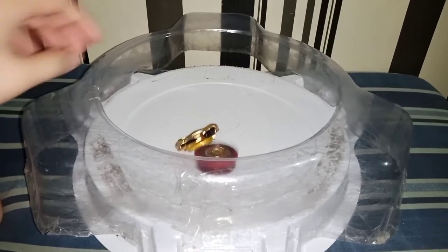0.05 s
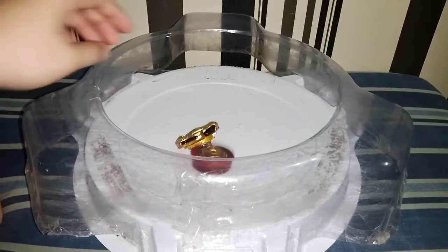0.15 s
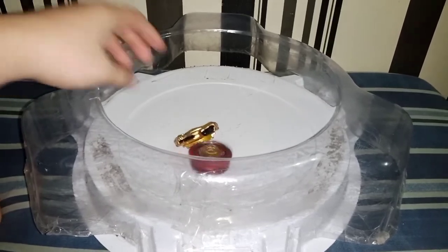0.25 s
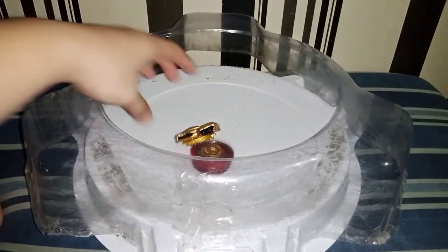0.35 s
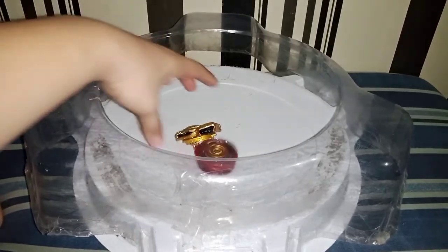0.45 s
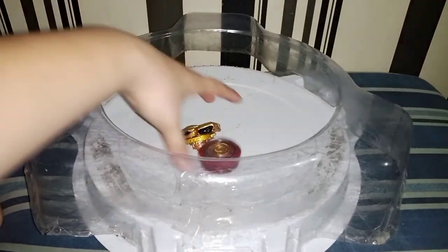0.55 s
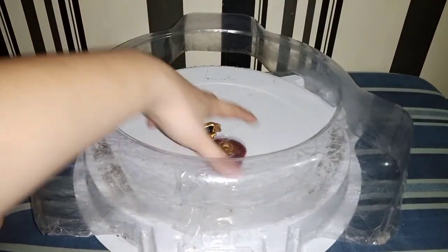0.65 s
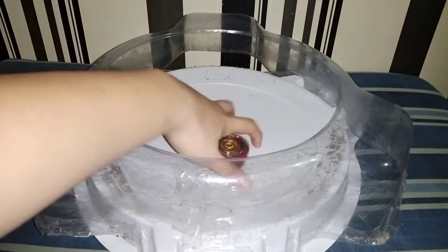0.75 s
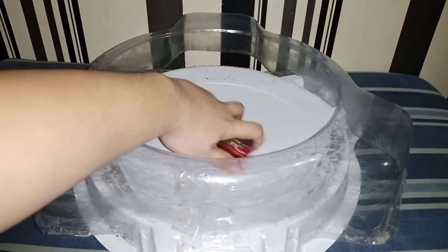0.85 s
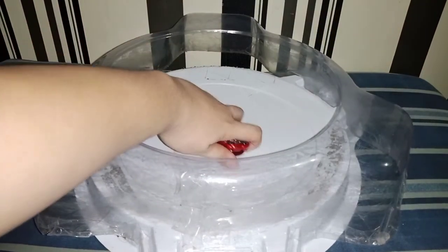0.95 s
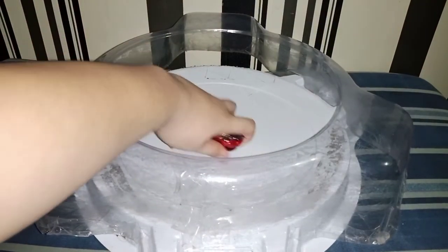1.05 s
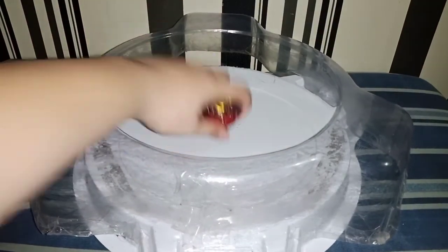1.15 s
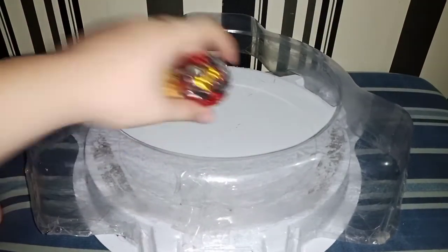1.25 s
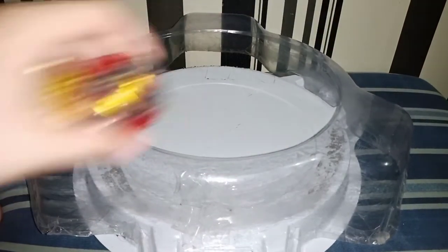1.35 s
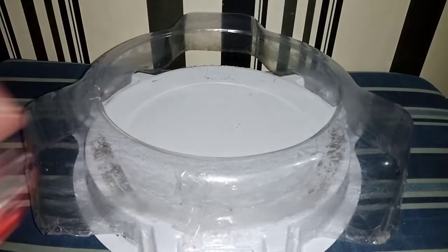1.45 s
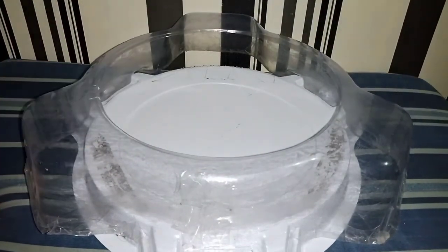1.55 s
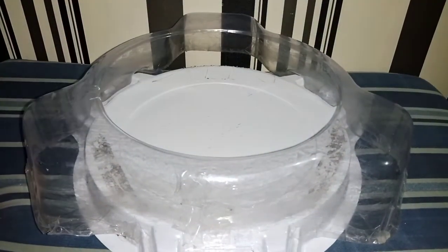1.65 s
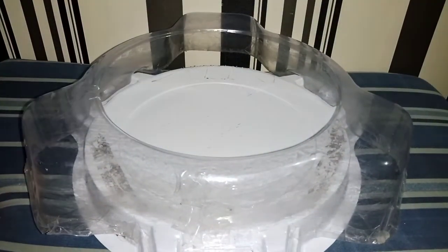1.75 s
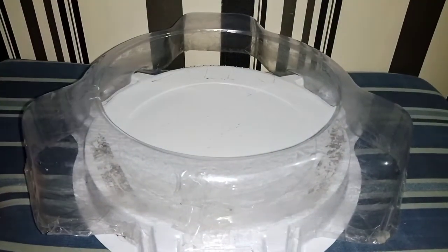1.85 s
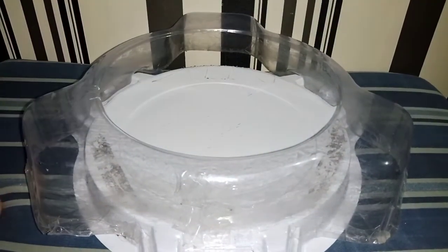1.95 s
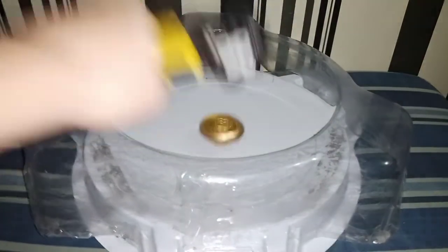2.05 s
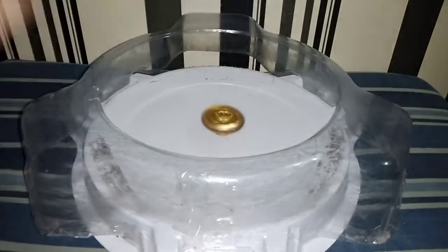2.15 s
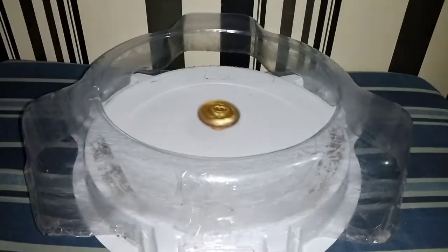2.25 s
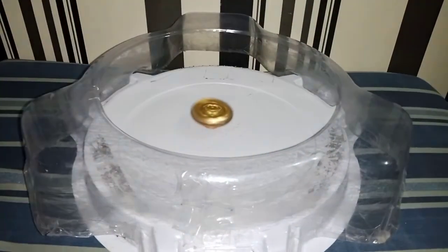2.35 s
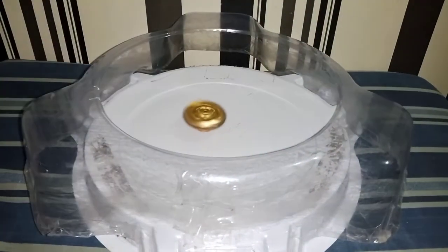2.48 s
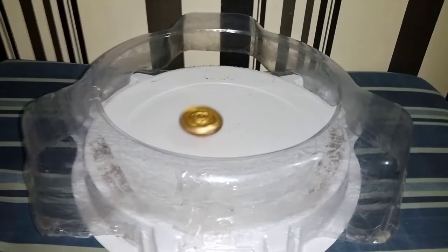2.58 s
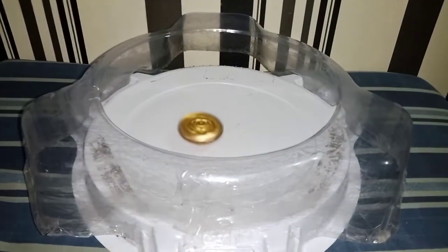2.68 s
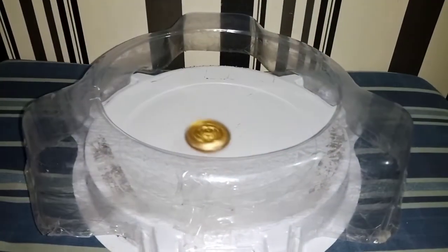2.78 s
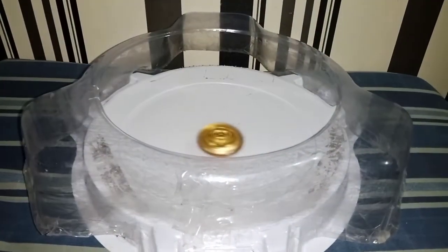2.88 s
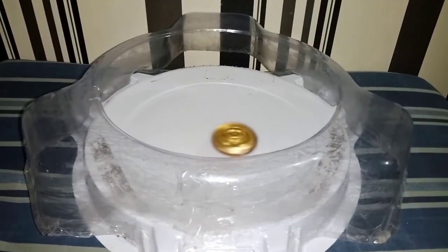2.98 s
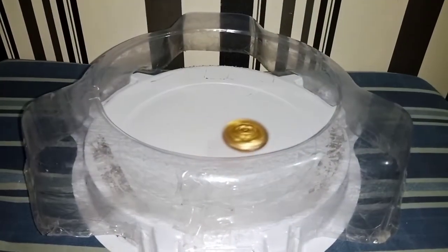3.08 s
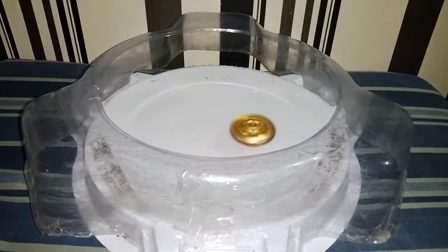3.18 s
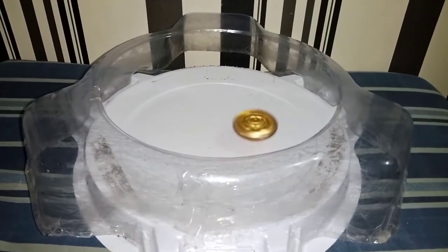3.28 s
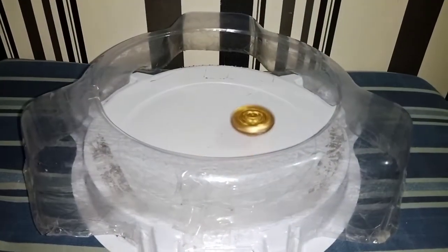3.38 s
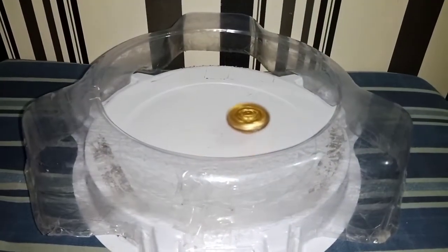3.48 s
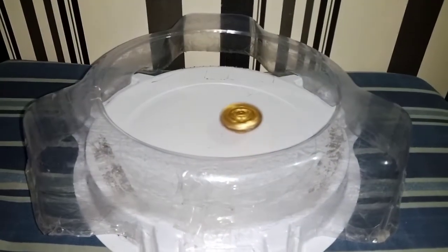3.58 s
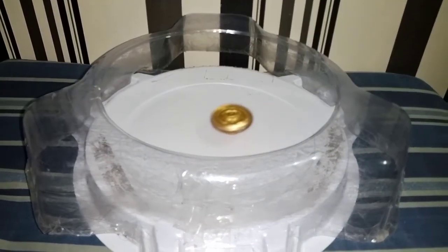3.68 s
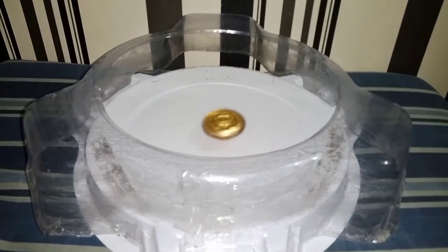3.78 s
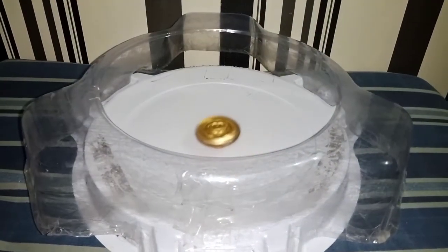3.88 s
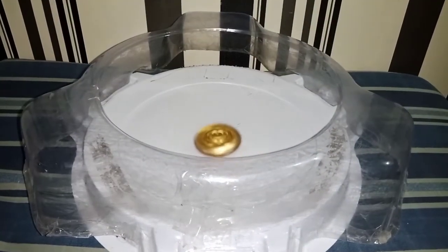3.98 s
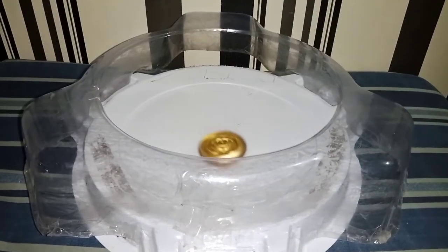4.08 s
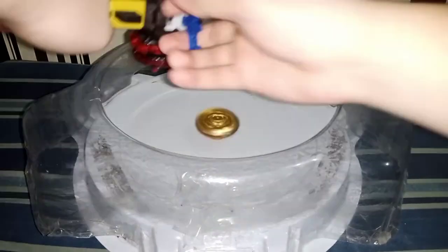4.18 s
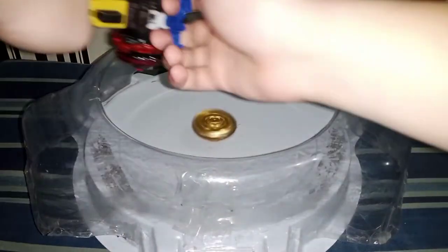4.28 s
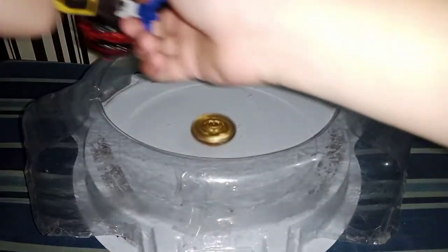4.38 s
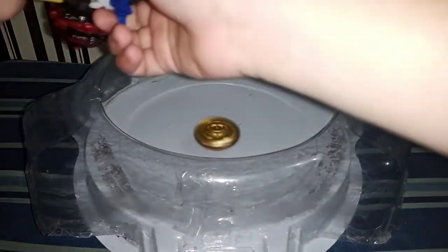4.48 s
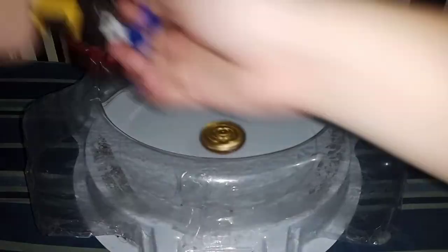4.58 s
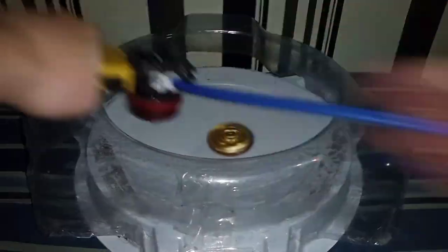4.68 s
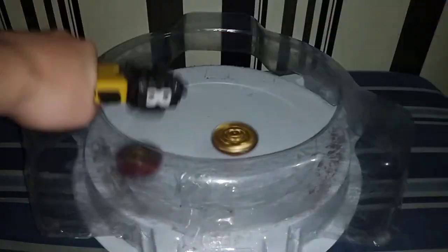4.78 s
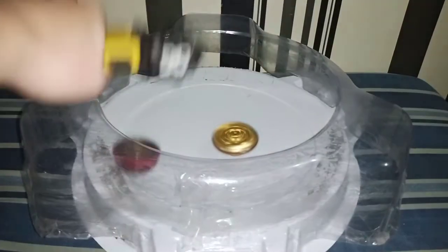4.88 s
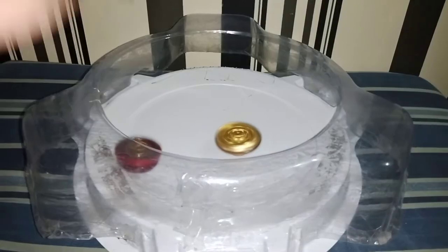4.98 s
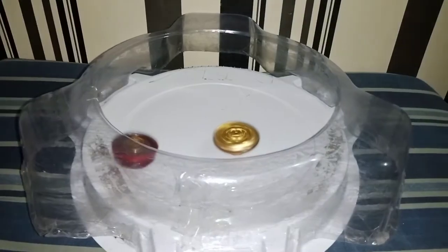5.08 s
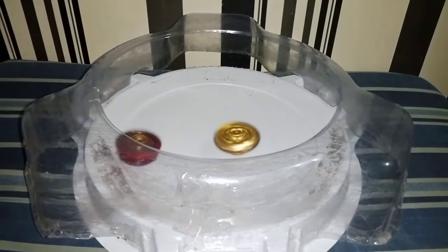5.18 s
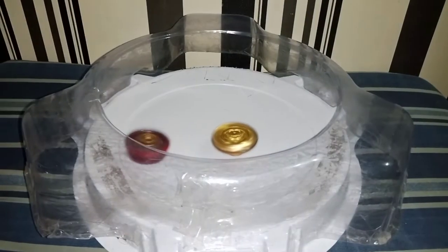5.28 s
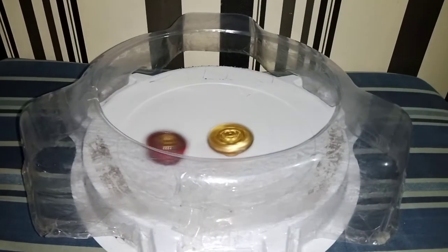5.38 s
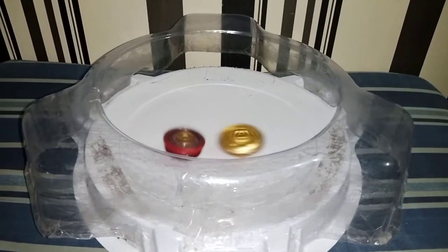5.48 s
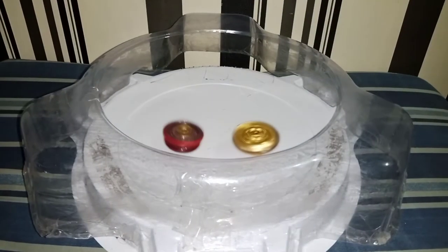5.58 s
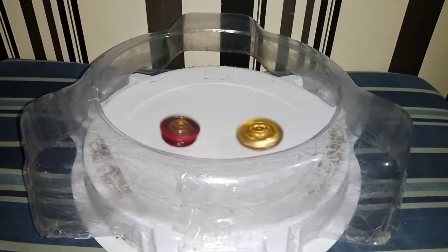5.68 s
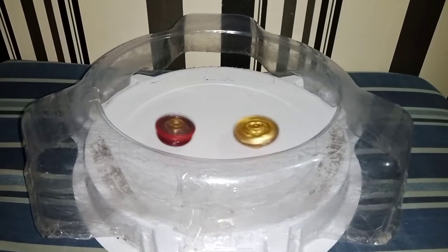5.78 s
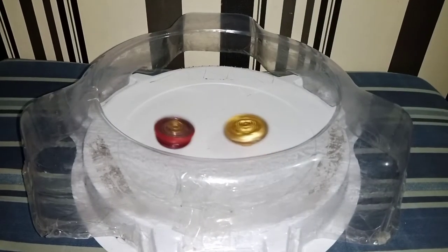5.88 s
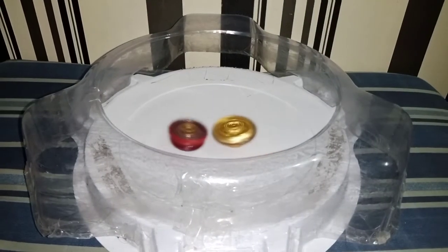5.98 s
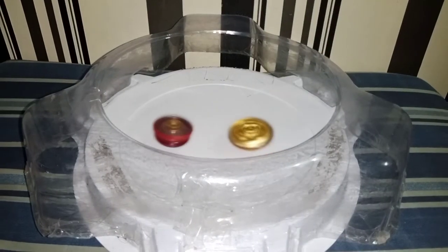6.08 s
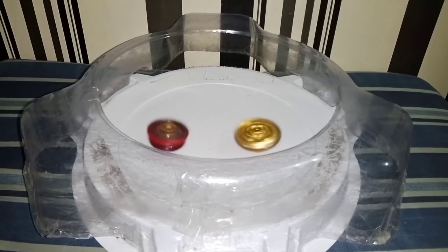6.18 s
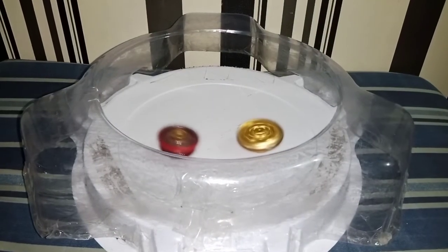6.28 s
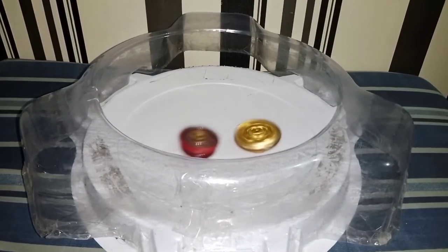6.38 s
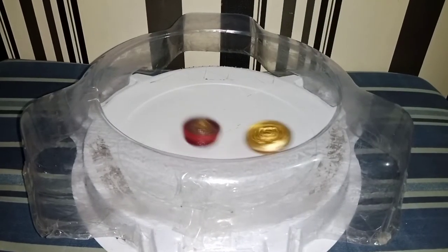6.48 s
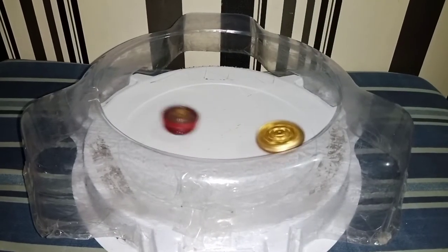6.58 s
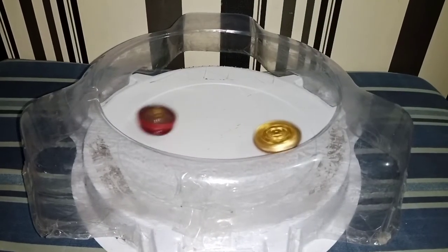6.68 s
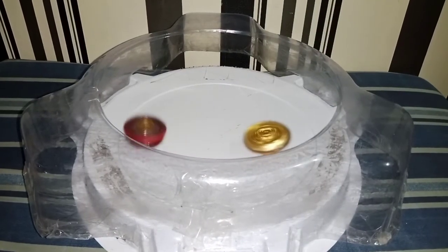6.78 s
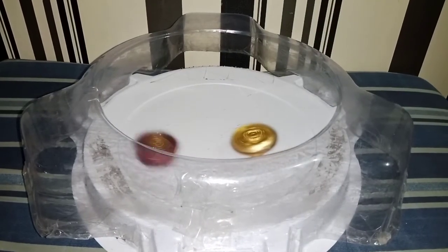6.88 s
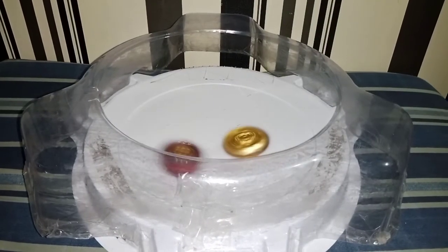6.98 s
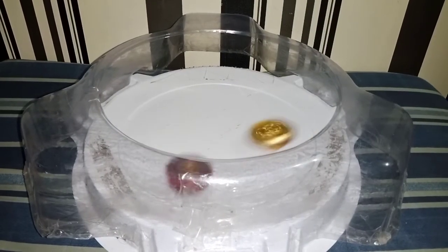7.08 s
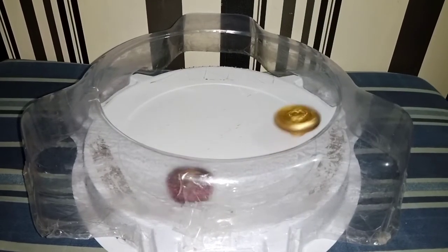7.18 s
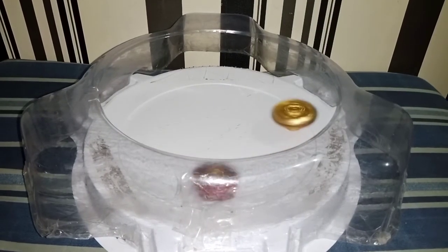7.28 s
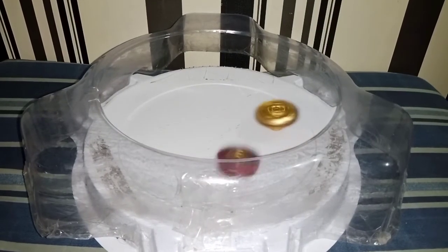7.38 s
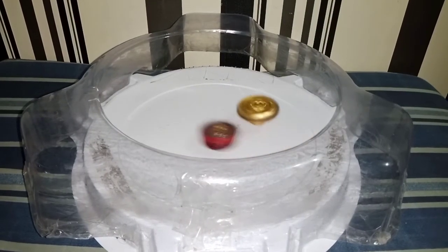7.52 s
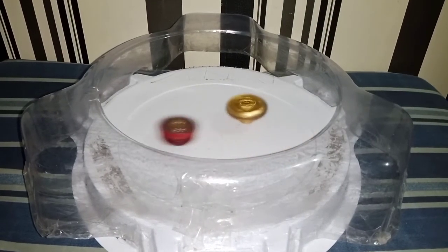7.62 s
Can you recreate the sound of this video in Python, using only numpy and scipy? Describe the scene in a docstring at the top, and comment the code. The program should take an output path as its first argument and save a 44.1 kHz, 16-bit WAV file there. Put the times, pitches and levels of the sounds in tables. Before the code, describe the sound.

Close phone pickup in a small hard room with soft steady hiss. Toy tops click lightly in the hands and the bowl thuds softly. A faint gear rip drops the first top with dull thumps, leaving a low wavering hum and tiny ticks. A second, far louder ratcheting rip ends in a heavy thump, then the two tops collide in separated sharp clacks over swelling hum.

```python
"""Toy tops in a plastic bowl

Two toy tops are fitted to a launcher, ripped loose and dropped into a thin plastic bowl on a mattress.
Hard parts clack as decaying modes with noisy cracks; gear ticks ring the launcher housing under cord hiss.
Spin hums as sines at the turning rate, the bowl floor thumps as short swings, and hands and jolts rumble
as low noise. A small hard room answers clacks and rips over steady air, all at one phone microphone."""
import sys
import numpy as np
from scipy import signal
from scipy.fft import rfft, irfft, next_fast_len
from scipy.io import wavfile
from scipy.ndimage import uniform_filter1d, map_coordinates

SR = 44100
rng = np.random.default_rng(int(sys.argv[2]) if len(sys.argv) > 2 else 0)


def master(y):
    """Save y as 16-bit WAV."""
    cut = np.clip(np.atleast_2d(y).T, -1, 1)
    pcm = np.round(cut * 32767)  # scale
    wavfile.write(sys.argv[1], SR, pcm.astype(np.int16))


def level_to_linear(level):
    """Convert decibel levels to linear amplitude factors, elementwise."""
    exponent = np.asarray(level, float) / 20
    return 10 ** exponent


N = 337365  # samples, 7.65 s

# steady air, spectrum shape: pitch_hz, relative_db
AIR_SPECTRUM = [(18, -37), (30, -7), (75, 3), (157, -18), (233, -7.5), (311, -14), (666, -9.5),
                (1220, -9.5), (1460, -3.5), (2120, -9), (3060, -14.5), (3700, -20.5), (4300, -30.5),
                (5590, -37), (13700, -45), (14800, -48), (16000, -30)]
AIR_DB = -55  # rms

# jolts that shake bowl and mattress: start_s, deep_level_db, upper_level_db
JOLTS = [(0.0, -48, -51.5), (0.93, -79, -57.5), (1.36, -77, -73.5), (1.79, -51, -61), (1.94, -45, -76),
         (2.13, -36, -37.5), (2.34, -53, -60), (2.64, -45, -74), (3.45, -63, -78), (4.22, -55, -66.5),
         (4.77, -54, -63.5), (4.96, -44, -45.5), (5.025, -53, -39), (5.1, -51.5, -59.5), (5.62, -41, -49.5),
         (6.24, -44, -61), (6.69, -54.5, -59), (7.17, -37, -51), (7.63, -40, -46.5)]
JOLT_RISE, JOLT_FALL = 220, 150  # dB per s
REST_DB = -76.5  # never quite still
# hands rumbling on the bowl: start_s, hold_s, level_db
HANDS = [(0.0, .45, -61), (.88, 0.11, -61.5), (1.866, 0.11, -46), (4.1, 0.17, -58), (4.72, 0.032, -62.5)]
HAND_RISE, HAND_FALL = 107, 58  # dB per s
# three bands of the rumble, spectrum shapes: pitch_hz, relative_db
DEEP_SPECTRUM = [(20, -31), (45, 13.5), (62, 20.5), (80, 14), (120, -49.0)]
UPPER_SPECTRUM = [(80, -42.5), (130, 3.0), (230, -2.5), (300, -9.0), (500, -42.5)]
HAND_SPECTRUM = [(50, -49.5), (75, 0.5), (120, 3.5), (140, -2), (220, -63.5)]

# blows on the bowl floor: start_s, swing_level_db, pitch_hz, relative_slap_db
THUMPS = [(0.009, -38, 107, -2), (0.29, -37.5, 66, -40), (0.374, -41.5, 94, -25), (0.439, -38, 65, -22),
          (0.75, -40.5, 69.6, -16), (0.962, -41, 94, 6), (1.019, -43.5, 81, 1), (1.77, -38.5, 141, -0.5),
          (1.833, -34, 194, -41), (1.899, -34, 127, -43), (2.005, -29.5, 122, -43),
          (2.071, -31.5, 110, -1.5), (2.115, -22.5, 90, -6), (2.164, -20.5, 111, -0.5),
          (2.199, -31.5, 104, 3.5), (2.238, -30, 66.4, -21), (2.561, -40, 100, -25),
          (4.752, -41.5, 114, -40), (4.892, -10.5, 145, 7.5), (4.897, -8, 109, -7), (5.012, -17, 96.7, -5),
          (5.06, -27, 83, -14), (5.447, -31.5, 98.2, -30), (5.574, -25.5, 119.5, 4.5),
          (6.137, -28.5, 103, -26), (6.581, -31, 115, -0.5), (7.146, -31.5, 108.7, 11),
          (7.18, -34.5, 92, -23.5)]
THUMP_CYCLES = 13  # swings until 60 dB down
# slap of contact on the floor, spectrum shape: pitch_hz, relative_db
SLAP_SPECTRUM = [(150, -46), (370, 7), (470, -3), (590, 9), (750, -6), (1200, -1.5), (2500, -55.5)]

# light taps of tops and launcher in the hands:
# start_s, relative_level_db, relative_crack_db, crack_ping_hz, relative_chatter_db
TAPS = [(0.0657, -24, -25.5, 6030, 6), (0.1365, -35.5, -18, 6100, 2), (0.1428, -27.5, -22.5, 5200, 2),
        (0.168, -42, -19, 4720, -10), (0.3167, -32, -21.5, 4300, 7.5), (0.323, -26.5, -23, 6500, -4),
        (0.348, -33.5, -23.5, 4300, -3.5), (0.4312, -24, -17.5, 4030, -14.5),
        (0.9668, -22, -19.5, 8750, -3.5), (0.9974, -39, -7, 4300, -8), (1.0277, -45, -24, 6370, 12),
        (1.058, -39.5, -22, 5540, 4.5), (1.083, -48, -13, 5450, -6), (1.4146, -41, -22, 4360, -3),
        (1.884, -33, -10, 5130, -17), (1.9183, -46.5, -8, 4530, -24), (2.2964, -38.5, -17, 4470, -2),
        (2.382, -32, -18, 4300, -2.5), (2.401, -42.5, -19, 4300, 4.5), (2.5774, -39, -16, 6160, -20),
        (2.6712, -37, -16, 4410, -11), (2.8078, -42, -14, 4970, -8), (2.828, -34, -10.5, 3930, -25),
        (3, -45, -19, 6050, -5), (3.011, -45.5, -11, 4000, -5), (3.2028, -40, -23, 5800, -2),
        (3.2388, -41.5, -20, 4600, -11), (3.329, -39.5, -18, 4530, -3), (3.3542, -33.5, -19.5, 5800, -24),
        (3.482, -48.5, -27, 4450, 5), (3.5353, -34.5, -19.5, 5890, -2.5), (3.633, -51, -16, 7500, -20),
        (4.675, -54.5, -4, 5630, 0.5), (4.711, -43, -17, 4770, 7), (5.254, -43.5, -16, 4380, 6),
        (5.4538, -40, -18.5, 4230, -12)]
TAP_CENTRE_HZ = 3220  # light taps ring the modes around here
# harder clacks, a firm tap in the hands, launcher parts, tops clashing:
# start_s, relative_level_db, ringing_centre_hz, relative_crack_db, relative_chatter_db
HARDER_CLACKS = [(2.613, -24.5, 2480, -21.5, -2.5), (4.728, -26.5, 2400, -10, -3),
                 (4.7502, -16, 2870, -23.5, -2.5), (4.7595, -18, 3680, -7, 1),
                 (4.8192, -6.5, 2600, -20, -3), (4.8799, -15, 2580, -11.5, -5.5),
                 (4.9256, -14.5, 3700, -8.5, -1.5), (4.9371, -8.5, 2430, -19, -9.5),
                 (5.5741, -15, 2980, -7.5, -7.5), (6.1347, -15, 3000, -11, 1.5),
                 (6.5818, -4, 2976, -20, -4), (7.1479, -4.5, 2800, -8.5, -9),
                 (7.5839, -9.5, 2640, -10, -8.5)]
HARDER_PING_HZ = 4600
# modes of the hard plastic parts, before random scatter: pitch_hz, relative_db, t60_s
PLASTIC = [(1516, 6.5, 0.038), (2061, 5.5, 0.024), (2522, 11, 0.01), (2865, 12.5, 0.0094),
           (2910, -9, 0.016), (3202, 3, 0.02), (3285, -4.5, 0.056), (3244, -1.5, 0.038), (3508, 4, 0.029),
           (3913, 6, 0.019), (4300, 5, 0.014), (4740, -2.5, .015)]
# bright edge of a contact, spectrum shape: pitch_hz, relative_db
CRACK_SPECTRUM = [(2350, -41), (4000, -3.5), (5310, 0.5), (7310, -3.5), (8750, -0.5), (13700, -5.5),
                  (14900, 5), (16000, -32)]
# dull body of a contact, spectrum shape: pitch_hz, relative_db
KNOCK_SPECTRUM = [(150, -38.5), (250, -44), (450, -10), (595, -0.5), (808, -10), (1580, -1), (1800, -8.5),
                  (2340, -40), (3960, -120)]
# decay of the small room: pitch_hz, t60_s
ROOM_DECAY = [(200, 0.32), (1400, 0.28), (3700, 0.28), (10000, 0.23), (16000, .2)]

# bursts of gear rattle: start_s, hold_s, rattle_level_db, hiss_start_level_db, hiss_growth_db
RIPS = [(2.075, 0.044, -50, -59.5, 9.5), (2.117, 0.1, -44, -46.5, -11.5), (4.764, 0.089, -25, -32.5, 4.5),
        (4.926, 0.04, -26, -45, 19.5)]
RIP_RISE, RIP_FALL = 840, 1500  # dB per s
# resonances of the launcher housing: pitch_hz, width_hz, relative_db
HOUSING = [(1144, 340, -9), (1794, 89, 3.5), (2080, 240, 3.5), (2530, 460, 1.5), (2600, 91, 8),
           (3380, 830, 0), (3835, 220, 1), (4300, 300, -14.5)]
# hiss of the sliding cord, spectrum shape: pitch_hz, relative_db
HISS_SPECTRUM = [(2350, -36.5), (4000, 5.5), (5100, -31), (5830, -11.5), (11600, -5.5), (13500, -9),
                 (14800, -8), (16000, -16)]
# the housing rings as the cord catches, rising in pitch:
# start_s, level_db, pitch_hz, glide_hz_per_s, t60_s
BITE = [(4.761, -17, 850, 9000, .09)]

# turning rate of both tops, one list each: time_s, turns_per_s
SPIN_RATES = [
    [(2.25, 92.5), (3.3, 90.3), (4.45, 77)],
    [(5.1, 106), (6.0, 111), (6.7, 106), (7.65, 87)],
]
# first top, its hum swells as it circles near: start_s, hold_s, level_db
GOLD = [(2.27, 0.27, -48), (2.69, 0.033, -54.5), (2.96, 0.61, -49.5), (4.0, 0.32, -49)]
# second top, swells of its hum: start_s, hold_s, level_db
RED = [(5.77, .02, -60), (6.19, .03, -56), (6.58, .21, -45.5), (7.08, .12, -46), (7.56, .15, -44)]
HUM_RISE, HUM_FALL = 210, 170  # dB per s
OCTAVE_DB, OCTAVE_FALL = -7.5, 66  # relative to the hum; the octave lingers, dB per s


def unit(x):
    """Scaled to rms 1."""
    return x / np.sqrt(np.mean(x ** 2) + 1e-20)


def along(points, hz):
    """Reads (Hz, value) points on a log frequency axis."""
    f, value = np.transpose(points)
    return np.interp(np.log(hz + 1), np.log(f + 1), value)


def wobble(rate):
    """A smooth random curve, rate knots a second."""
    knots = rng.standard_normal(int(N * rate / SR) + 4)
    return map_coordinates(knots, [np.arange(N) * rate / SR])


def filtered(x, response):
    """x shaped by a response of frequency."""
    n = np.shape(x)[-1]
    m = next_fast_len(n + 8192)
    return irfft(rfft(x, m) * response(np.fft.rfftfreq(m, 1 / SR)), m)[..., :n]


def noise(spectrum, size=N):
    """Coloured noise of rms 1."""
    return unit(filtered(rng.standard_normal(size), lambda hz: level_to_linear(along(spectrum, hz))))


def swell(start_s, hold_s, db, rise, fall):
    """Gain that climbs, holds and sinks at steady dB per second."""
    t = np.arange(N) / SR - start_s
    return level_to_linear(db - rise * np.clip(-t, 0, None) - fall * np.clip(t - hold_s, 0, None))


def room(x, first_s=0.0089):
    """The walls answer after a gap, each frequency dying at its own speed."""
    hz, t, z = signal.stft(rng.standard_normal(SR // 2), SR, nperseg=256)
    decay = level_to_linear(-60 * t / along(ROOM_DECAY, hz)[:, None])
    tail = signal.istft(z * decay, SR, nperseg=256)[1]
    tail = np.pad(tail, (int(first_s * SR), 0)) / np.linalg.norm(tail)
    return signal.fftconvolve(x, tail)


def air():
    """Steady murmur of noise with faint patches in time and frequency."""
    z = signal.stft(rng.standard_normal(N), nperseg=512)[2]
    field = uniform_filter1d(rng.standard_normal(z.shape), 6, 0)
    field = uniform_filter1d(field, 14, 1)
    patchy = signal.istft(z * level_to_linear(1.21 * unit(field)), nperseg=512)[1][:N]
    murmur = unit(filtered(patchy, lambda hz: level_to_linear(along(AIR_SPECTRUM, hz))))
    return level_to_linear(AIR_DB + 0.44 * wobble(0.17)) * murmur


def bumps():
    """Jolts and hands shake bowl and mattress as lumpy low noise."""
    def shaken(column):
        rest = level_to_linear(REST_DB + 3 * wobble(5.1))
        return rest + sum(swell(row[0], 0, row[column], JOLT_RISE, JOLT_FALL) for row in JOLTS)

    def lumpy(spectrum):
        return unit(level_to_linear(3.4 * wobble(30)) * noise(spectrum))

    hands = sum(swell(*row, HAND_RISE, HAND_FALL) for row in HANDS)
    jolts = shaken(1) * noise(DEEP_SPECTRUM) + shaken(2) * lumpy(UPPER_SPECTRUM)
    return jolts + hands * lumpy(HAND_SPECTRUM)


def thumps():
    """The bowl floor swings a few cycles; a noisy slap marks the contact."""
    out, t = np.zeros(N + SR), np.arange(SR // 3) / SR
    for s, db, hz, slap_db in THUMPS:
        swing = np.sin(2 * np.pi * hz * t) + 0.16 * np.sin(2 * np.pi * 1.7 * hz * t)
        swing *= level_to_linear(-60 * t * hz / THUMP_CYCLES) * (1 - np.exp(-t / 0.0016))
        slap = level_to_linear(slap_db - 15.5 - 60 * t / 0.18) * noise(SLAP_SPECTRUM, len(t))
        out[round(s * SR):][:len(t)] += level_to_linear(db) * (swing + slap)
    return out[:N]


def clacks():
    """Each contact rings the modes near its centre, cracks, knocks and chatters on for a moment."""
    out, t = np.zeros(N + SR), np.arange(SR // 16) / SR
    hz, mode_db, t60 = np.transpose(PLASTIC)[:, :, None]
    contacts = [(s, db, TAP_CENTRE_HZ, *rest) for s, db, *rest in TAPS]
    contacts += [(*first, HARDER_PING_HZ, chatter_db) for *first, chatter_db in HARDER_CLACKS]
    for s, db, centre_hz, crack_db, ping_hz, chatter_db in contacts:
        # a sharp contact wakes modes far from the centre, a dull one few
        near_db = (1.6 * crack_db - 11.5) * np.abs(np.log2(hz / centre_hz))
        strength = level_to_linear(mode_db + np.maximum(near_db, -24) + rng.normal(0, 2.2, hz.shape))
        phase = 2 * np.pi * (hz * rng.normal(1, 0.0046, hz.shape) * t + rng.random(hz.shape))
        ring = np.sum(strength * level_to_linear(-60 * t / t60) * np.sin(phase), axis=0)
        ring *= 1 - np.exp(-t / 0.00066)
        ring *= 4.92 / np.linalg.norm(ring)
        ring += level_to_linear(crack_db - 11.0 - 60 * t / 0.046) * noise(KNOCK_SPECTRUM, len(t))

        # sparse little touches that fade out after the first contact
        struck = rng.random(len(t)) < .025
        touches = rng.uniform(-1.2, 1, len(t)) * struck * np.clip(1 - t / 0.031, 0, 1)
        touches *= level_to_linear(chatter_db) / np.linalg.norm(touches)
        touches[0] = 1
        body = signal.fftconvolve(ring, touches)

        ping = level_to_linear(-17.5 - 1.0 * db)  # quiet contacts ping clearer than loud ones

        def colour(f):
            return level_to_linear(along(CRACK_SPECTRUM, f)) * (1 + ping / (1 + ((f - ping_hz) / 320) ** 2))

        edge = level_to_linear(-60 * t / 0.016) * (1 - np.exp(-t / 0.00067))
        crack = unit(filtered(rng.standard_normal(len(t)), colour))
        crack *= level_to_linear(crack_db + 4.5) * np.convolve(np.abs(touches), edge)[:len(t)]
        # a click 5 ms late, heard only through the room
        click = np.abs(np.roll(touches, SR // 200)) * rng.choice([-1, 1], len(t))
        click = filtered(click, colour)
        click *= np.linalg.norm(crack) / np.linalg.norm(click)

        mix = level_to_linear(-4.5) * room(body + np.pad(click, (0, len(t) - 1)), first_s=0.0082)
        mix[:len(body)] += body
        mix[:len(t)] += crack
        out[round(s * SR):][:len(mix)] += level_to_linear(db - 3.0) * mix
    return out[:N]


def ripcord():
    """Teeth strike the gear in dense uneven ticks that ring the housing; the sliding cord hisses."""
    time = np.arange(N) / SR
    ticks = (rng.random(N) < 1300 / SR) * rng.standard_normal(N) * level_to_linear(2.6 * wobble(90))

    def housing(f):
        # resonances of alternating sign
        return sum((-1) ** k * level_to_linear(db) * 1j * f * width / (centre ** 2 - f * f + 1j * f * width)
                   for k, (centre, width, db) in enumerate(HOUSING))

    rattle = unit(filtered(ticks, housing))
    hiss = unit(level_to_linear(2.78 * wobble(120)) * noise(HISS_SPECTRUM))
    direct = np.zeros(N)
    for s, length, rattle_db, hiss_db, grows_db in RIPS:
        grown = np.clip((time - s) / length, 0, 1)
        burst = level_to_linear(rattle_db) * rattle + level_to_linear(hiss_db + grows_db * grown) * hiss
        direct += swell(s, length, 0, RIP_RISE, RIP_FALL) * burst

    s, db, hz, glide, t60 = BITE[0]
    t = np.clip(time - s, 0, None)
    bite = np.sin(2 * np.pi * (hz + glide * t / 2) * t) * (1 - np.exp(-t / .008))
    direct += level_to_linear(db - 60 * t / t60) * bite
    return direct + level_to_linear(-5.5) * room(direct)[:N]


def turning(rows):
    """Angle of a top in radians, summed from its turning rate."""
    s, rate = np.transpose(rows)
    # outside the listed times the rate is held at -120
    turns_per_s = np.interp(np.arange(N) / SR, s, rate, -120, -120)
    return 2 * np.pi * np.cumsum(turns_per_s) / SR


def spin():
    """An off-centre top shakes the floor once a turn; the second also twice."""
    first, second = (turning(rows) for rows in SPIN_RATES)
    gold, red = (sum(swell(*row, HUM_RISE, HUM_FALL) for row in rows) for rows in (GOLD, RED))
    octave = sum(swell(s, 0.057, db + OCTAVE_DB, HUM_RISE, OCTAVE_FALL) for s, _, db in RED)
    hum = gold * level_to_linear(1.5 * wobble(30)) * np.sin(first)
    hum += red * level_to_linear(1.4 * wobble(11)) * np.sin(second)
    hum += octave * level_to_linear(0.9 * wobble(37)) * np.sin(2 * second)
    return np.sqrt(2) * hum  # levels are rms


def scene():
    """Everything summed in mono at one microphone."""
    return (air() + bumps() + thumps() + clacks() + ripcord() + spin())[None]


def low_pass(x):
    """Removes everything above the highest recorded frequency."""
    return signal.sosfilt(signal.butter(12, 16800, fs=SR, output="sos"), x)


def record(dry):
    """A phone microphone, deaf to the deepest bass and to everything above 15.7 kHz."""
    heard = filtered(dry, lambda hz: (1j * hz / (45 + 1j * hz)) ** 2 * (hz < 15700))
    return low_pass(heard)


dry = scene()
out = record(dry)
master(out)
```